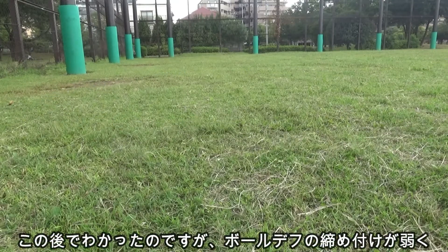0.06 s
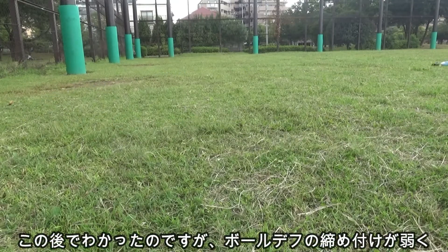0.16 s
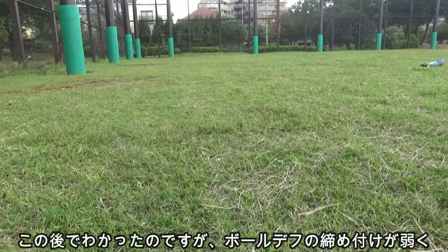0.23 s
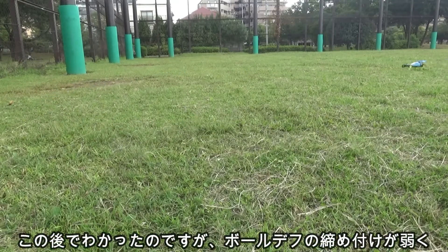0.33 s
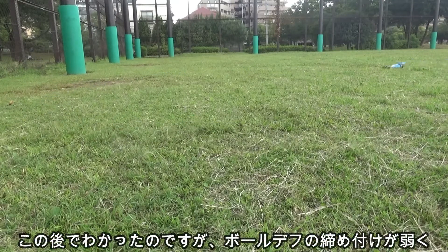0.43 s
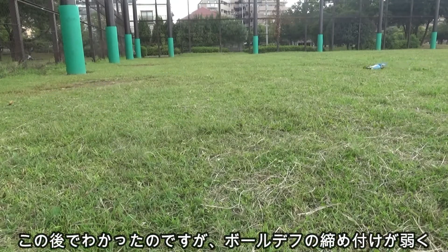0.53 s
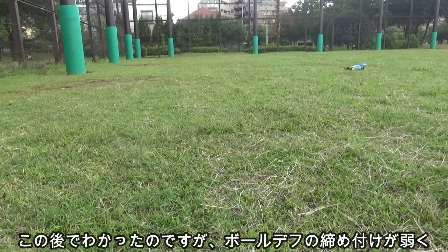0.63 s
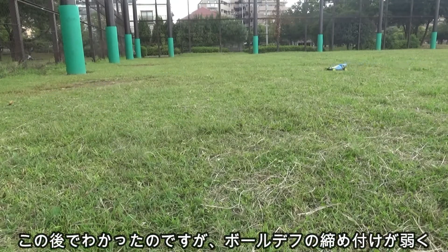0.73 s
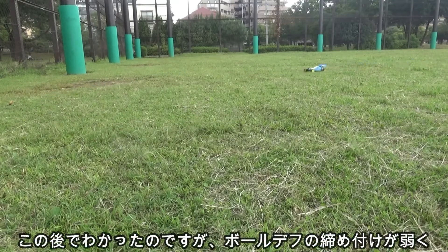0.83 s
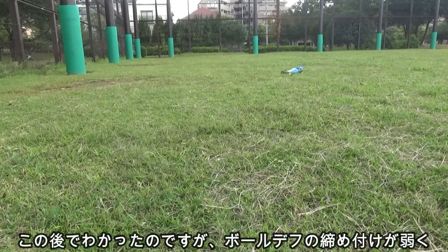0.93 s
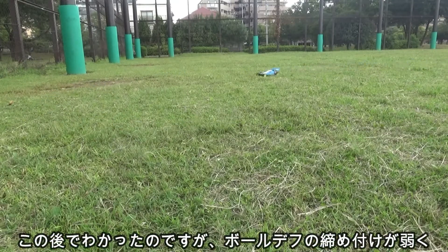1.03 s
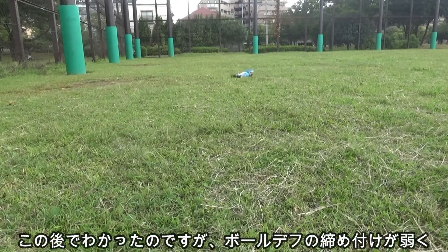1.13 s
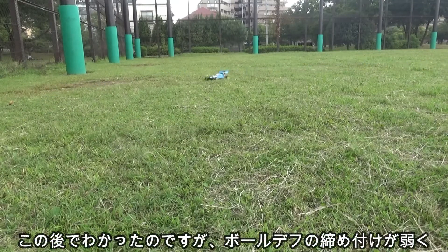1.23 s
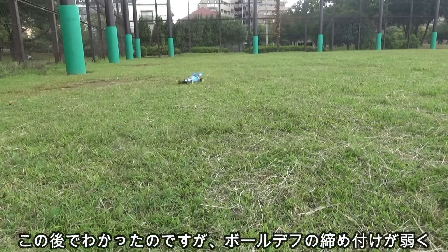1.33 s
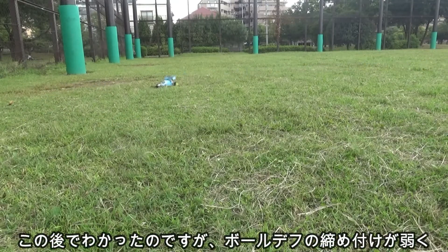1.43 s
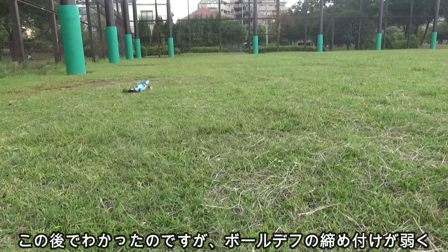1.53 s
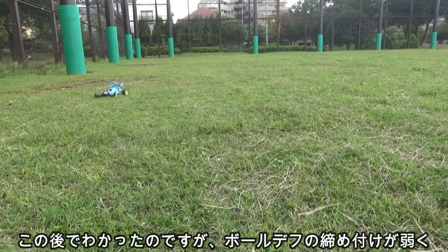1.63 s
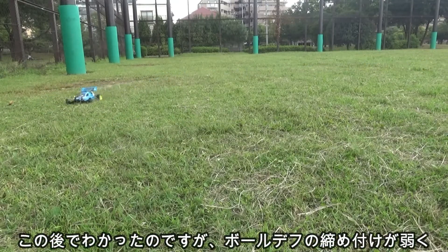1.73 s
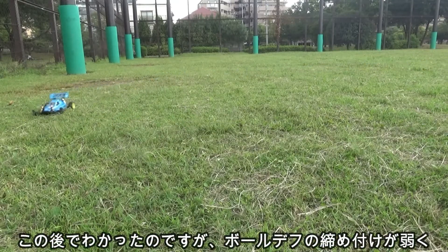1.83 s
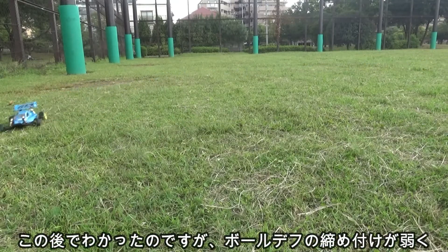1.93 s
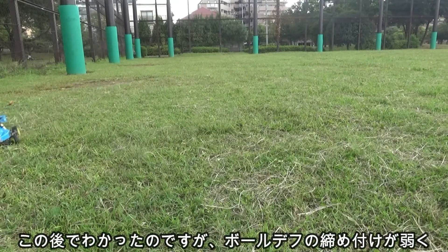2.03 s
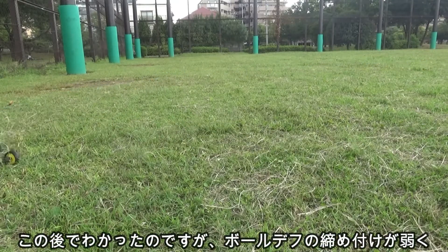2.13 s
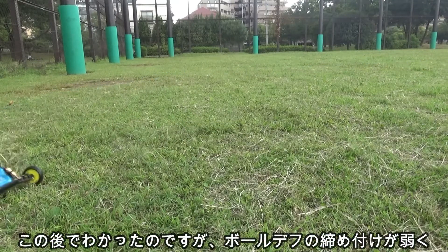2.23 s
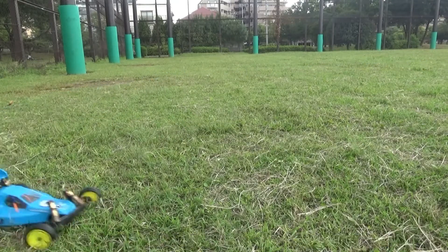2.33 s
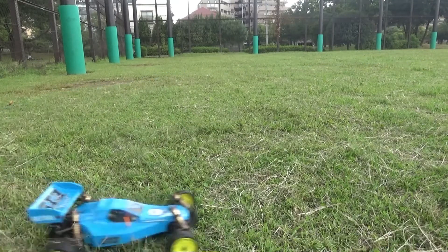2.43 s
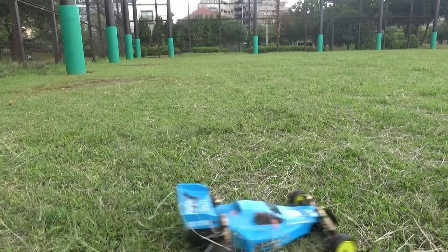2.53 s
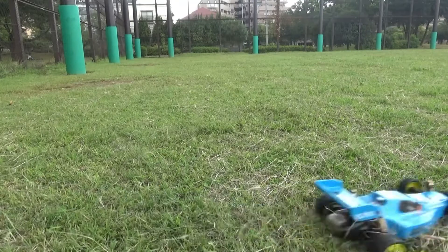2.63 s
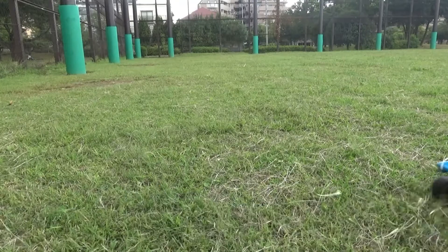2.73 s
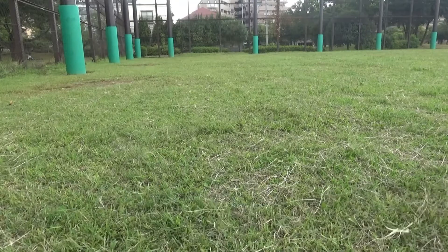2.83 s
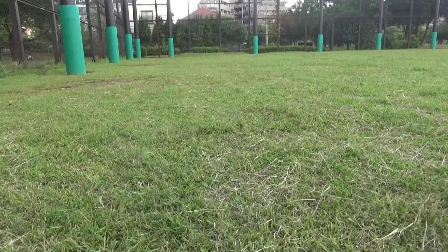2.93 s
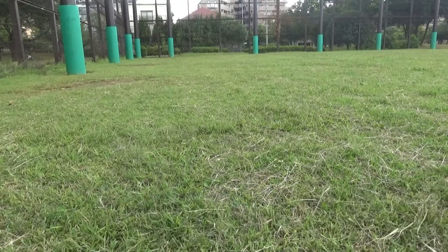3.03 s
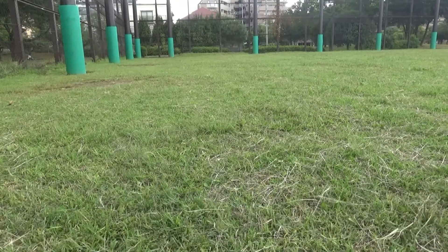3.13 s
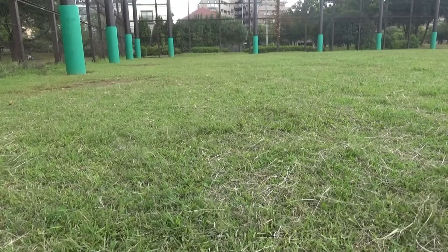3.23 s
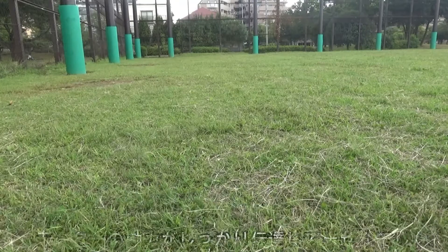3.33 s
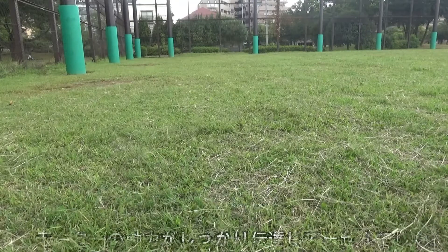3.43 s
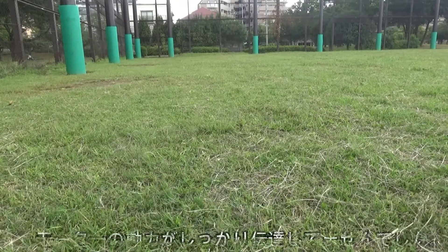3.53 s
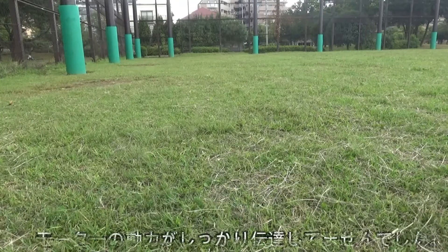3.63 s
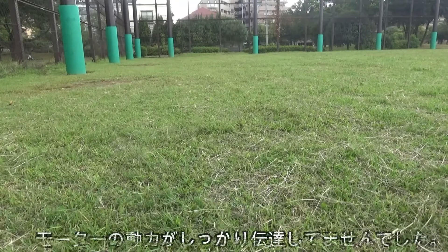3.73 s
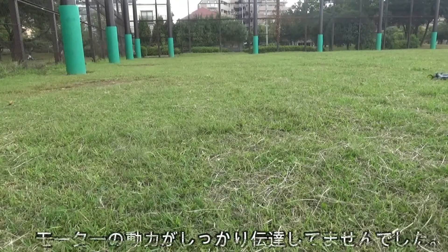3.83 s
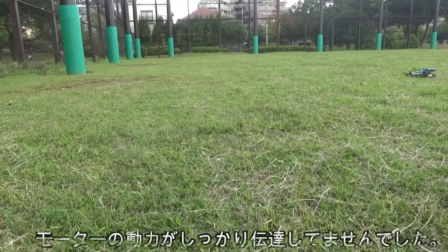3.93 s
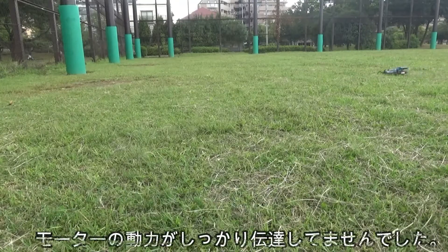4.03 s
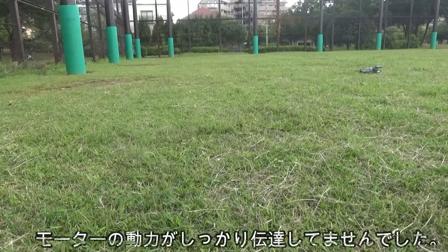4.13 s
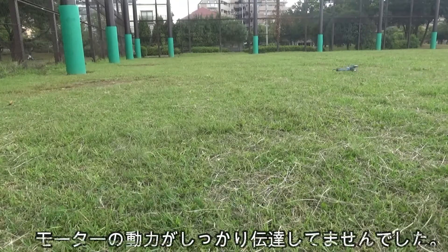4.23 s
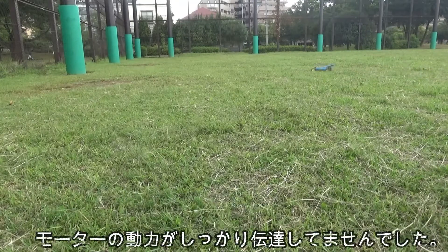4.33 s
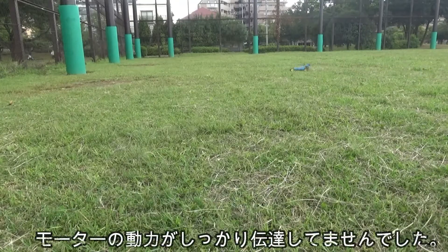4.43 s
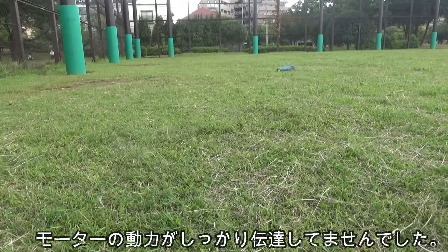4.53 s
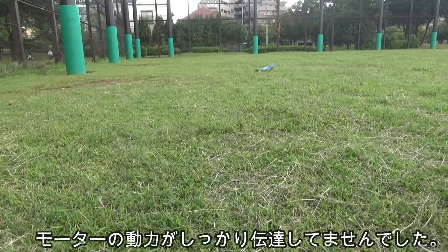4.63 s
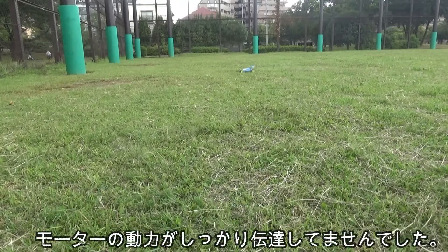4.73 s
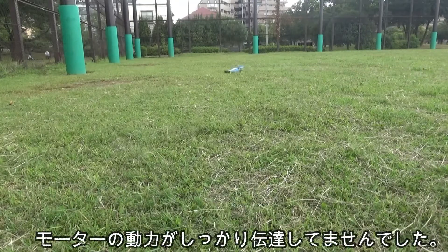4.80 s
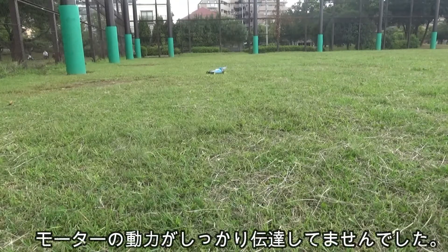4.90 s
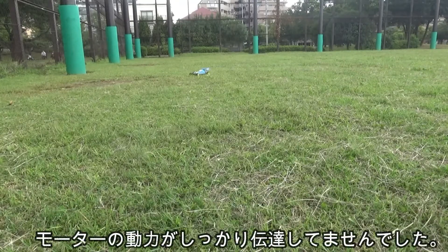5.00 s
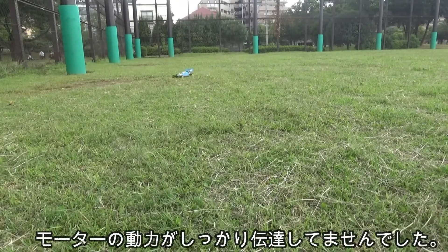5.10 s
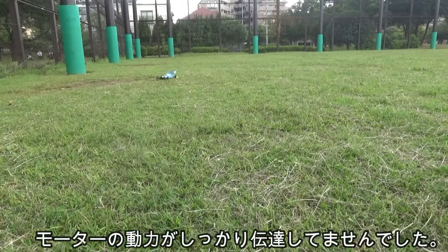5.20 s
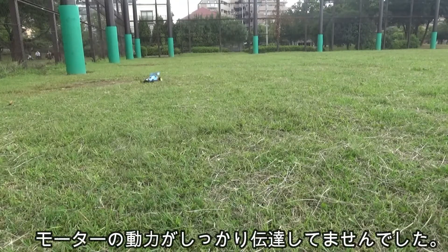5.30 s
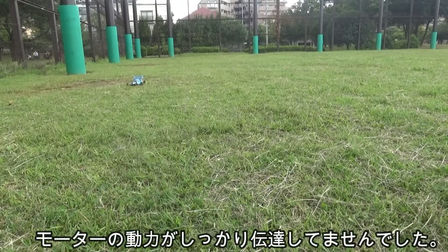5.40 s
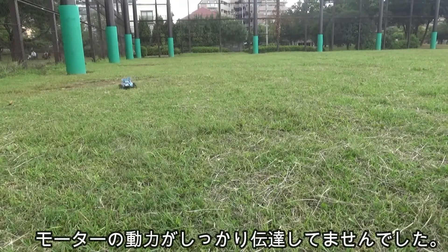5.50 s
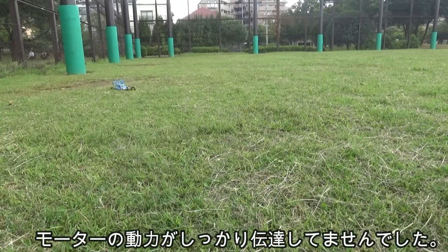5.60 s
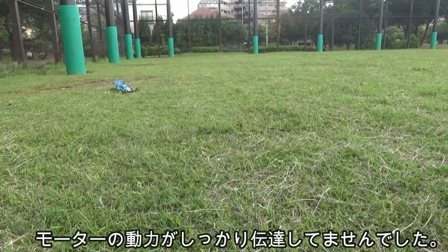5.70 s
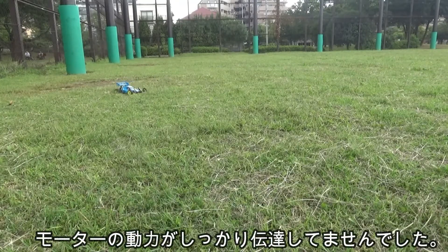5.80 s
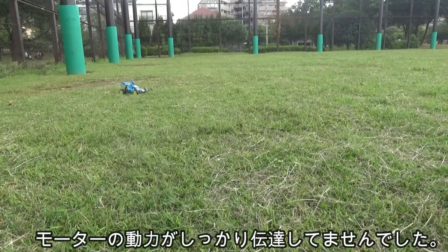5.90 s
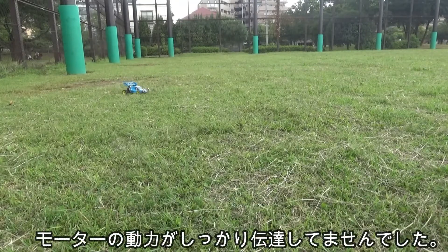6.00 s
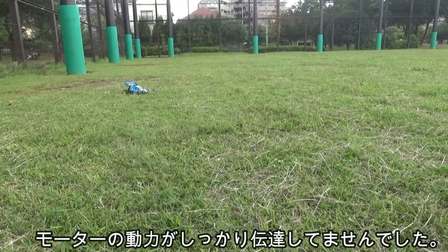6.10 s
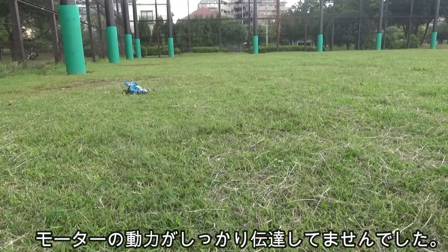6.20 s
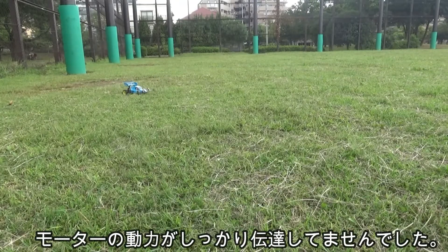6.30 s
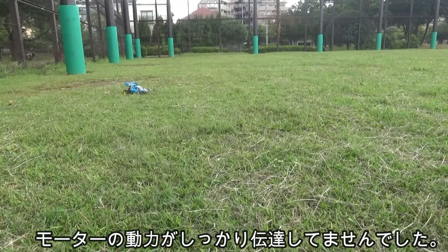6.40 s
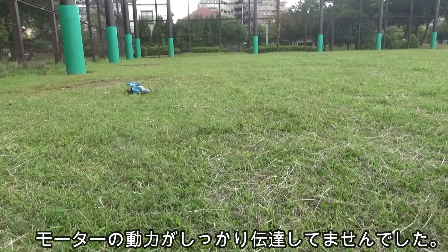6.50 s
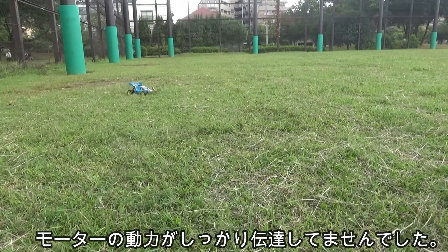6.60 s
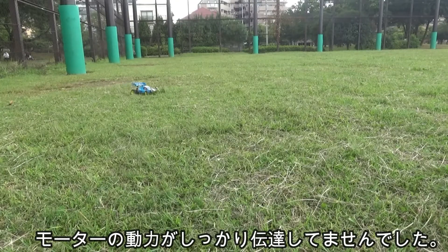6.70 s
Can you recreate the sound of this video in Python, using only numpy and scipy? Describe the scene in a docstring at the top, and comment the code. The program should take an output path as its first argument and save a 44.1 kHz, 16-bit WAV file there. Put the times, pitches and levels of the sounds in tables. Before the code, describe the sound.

A small electric remote-controlled buggy drives over bumpy grass with a high, wavering gear whine and a gritty plastic rattle. It approaches, passes very close with squeals, knocks and chirps, then recedes and returns at a distance. The gears coast down to near silence, the body clicks, and the motor spins up sharply. Fixed stereo microphone low in an open park, with soft low rumble behind.

```python
"""A gritty plastic rattle and a gear whine come from a small electric buggy passing on a grass field.
Tooth contact sets the whine's pitch, which races over hops and sags in thick grass; a hail of tooth knocks
excites the resonances of gearbox, motor can, chassis and shell. Noise bands (squeals, a grass rasp, a click),
chirps and knocks punctuate the drive. The gears coast down, the body clicks and the mesh spins up again.
Level and phase differences place the buggy in stereo, over faint echoes and a low park rumble of shaped noise."""
import sys
import numpy as np
from scipy import signal
from scipy.io import wavfile
from scipy.ndimage import uniform_filter1d

SR = 44100
rng = np.random.default_rng(int(sys.argv[2]) if len(sys.argv) > 2 else 0)


def master_out(mix):
    """Clip the mix to full scale and print it as 16-bit PCM to the path in sys.argv[1]."""
    frames = np.transpose(np.atleast_2d(mix))
    ceiling = np.clip(frames, -1, 1)
    pcm = np.round(ceiling * 32767).astype(np.int16)
    wavfile.write(sys.argv[1], SR, pcm)


N = 297675
T = np.arange(N) / SR


def amp(db):
    """Decibel definition: 20 dB is a factor of ten in amplitude."""
    return 10 ** (np.asarray(db) / 20)


def evened(x):
    """Normalization to unit root-mean-square."""
    return x / np.sqrt(np.mean(abs(x) ** 2) + 1e-20)


def read(points, hz):
    """Interpolation of a spectrum curve along logarithmic frequency."""
    f, value = np.transpose(points)
    return np.interp(np.log(hz + 1), np.log(f + 1), value)


def columns(rows, t):
    """Linear interpolation in time of every column after the first, which is time."""
    s, *values = np.transpose(rows)
    return [np.interp(t, s, v) for v in values]


def wander(lo_hz, hi_hz, count=24):
    """Superposition: sines of random phase over a range of rates make a slow random curve of unit RMS."""
    t = T[::16]
    rates_hz = np.geomspace(lo_hz, hi_hz, count)
    sines = sum(np.sin(2 * np.pi * (f * t + rng.random())) for f in rates_hz)
    return np.interp(T, t, evened(sines))


def ringing(modes, hz, blend, steep=1.115):
    """Resonance: bell-shaped power peaks, blended between two colours, total 1 in every frame."""
    power = 0
    for f, w, *db in modes:
        mode_db = db[0] + blend * (db[-1] - db[0])
        power = power + amp(mode_db) ** 2 / (1 + (2 * (hz - f) / w) ** 2) ** steep
    return power / power.sum(0)


# Gear mesh while the wheels grip: time_s, tooth_rate_hz, level_db
DRIVE = [(0, 6050, -39), (.2, 6070, -35), (.7, 6160, -34), (1.18, 6110, -28), (1.55, 5990, -22.5),
         (1.8, 6240, -26), (2.18, 5940, -25), (2.45, 5890, -18), (2.72, 6050, -26.5), (2.84, 5730, -22),
         (3.0, 6040, -25), (3.3, 5860, -28), (3.6, 5855, -30), (3.9, 5850, -34), (4.2, 5890, -36.5),
         (4.5, 5970, -31.5), (5.1, 6070, -32), (5.3, 6080, -24), (5.57, 6310, -37)]
# Gear mesh coasting to a stop with one last free spin: time_s, tooth_rate_hz, level_db
COAST = [(5.63, 3600, -46), (5.72, 3500, -48), (5.77, 3450, -60), (5.83, 3420, -50), (5.96, 3320, -55),
         (5.978, 4200, -59), (6.005, 4700, -52), (6.04, 4900, -51), (6.065, 4750, -52), (6.088, 4350, -62)]
# Gear mesh spinning up again: time_s, tooth_rate_hz, level_db
SPIN_UP = [(6.35, 1200, -46), (6.366, 1400, -35), (6.385, 1950, -52), (6.402, 2580, -30),
           (6.418, 2680, -29), (6.432, 3300, -50), (6.452, 3900, -30), (6.476, 4750, -37),
           (6.52, 5750, -37), (6.56, 6250, -38), (6.75, 6150, -36)]
OCTAVE_DB = -30  # mean level of the second harmonic against the first
COAST_OCTAVE_DB = 0  # the free-spinning gears sound their second harmonic
WHINE_DB_PER_KHZ = -3  # unloaded gears quieten as they race


def whine(rows, racing_khz=0, octave_db=OCTAVE_DB, flutter_db=3.4, jitter=.005):
    """Gear-mesh excitation: teeth meet at a wavering rate; uneven gears modulate frequency and amplitude."""
    hz, db = columns(rows, T)
    hz = hz + 1000 * racing_khz
    db = db + WHINE_DB_PER_KHZ * racing_khz
    start_s, end_s = rows[0][0], rows[-1][0]
    on = np.clip(np.minimum(T - start_s, end_s - T) / 0.009 + 1, 0, 1)  # 9 ms fades outside the span
    phase = 2 * np.pi * np.cumsum(hz * (1 + jitter * wander(14, 110))) / SR
    octave = amp(octave_db + 3 * wander(1, 6, count=8)) * np.sin(2 * phase)
    tone = np.sin(phase) + octave
    return np.sqrt(2) * on * amp(db + flutter_db * wander(9, 200)) * tone


# Hops over tufts, where the wheels lose grip: start_s, length_s, tooth_rate_rise_hz, rattle_change_db
HOPS = [(0.11, 0.052, 280.0, -3.5), (0.51, 0.063, 150.0, -3.0), (0.719, 0.099, 200.0, -2.0),
        (0.956, 0.236, 180.0, -4.5), (1.253, 0.071, 340.0, -4.0), (1.316, 0.118, 280.0, 0.5),
        (1.438, 0.136, 400.0, -3.5), (1.463, 0.034, 180.0, -3.5), (1.562, 0.086, 250.0, -2.0),
        (1.641, 0.058, 190.0, -3.0), (1.696, 0.113, 200.0, -1.0), (1.815, 0.128, 150.0, -1.0),
        (1.949, 0.217, 400.0, 1.5), (2.202, 0.305, 530.0, -1.5), (2.362, 0.055, 230.0, -1.0),
        (2.459, 0.128, 330.0, -2.0), (2.595, 0.057, 160.0, -1.0), (2.844, 0.14, 560.0, -2.0),
        (2.926, 0.025, 360.0, -1.0), (3.129, 0.072, 350.0, -2.5), (3.21, 0.119, 290.0, -3.5),
        (3.714, 0.034, 370.0, -1.0), (4.131, 0.072, 360.0, -4.0), (4.384, 0.082, 290.0, -2.0),
        (4.455, 0.209, 270.0, -0.5), (4.65, 0.09, 390.0, -3.0), (4.916, 0.096, 400.0, -3.0),
        (5.2, 0.109, 210.0, -2.0), (5.326, 0.065, 440.0, -3.0), (5.525, 0.066, 190.0, -2.5)]
# Thick grass grabbing the wheels: centre_s, tooth_rate_drop_hz
SNAGS = [(0.096, 440.0), (0.184, 230.0), (0.278, 310.0), (0.333, 380.0), (0.594, 150.0), (0.886, 170.0),
         (0.944, 160.0), (1.182, 210.0), (1.346, 240.0), (1.432, 100.0), (1.545, 150.0), (1.7, 200.0),
         (1.986, 210.0), (2.066, 140.0), (2.262, 210.0), (2.41, 270.0), (2.504, 220.0), (2.655, 120.0),
         (2.842, 170.0), (3.113, 220.0), (3.224, 360.0), (3.33, 220.0), (3.429, 170.0), (3.53, 190.0),
         (3.719, 180.0), (4.603, 220.0), (4.967, 240.0), (5.227, 280.0), (5.51, 220.0)]
HOP_SKEW = .7  # under 1 the racing peaks early
LANDING_DB_PER_KHZ, LANDING_S = 0.5, 0.028  # jolt as the wheels bite again; time from its peak to 1/e
SNAG_S = .013  # time from the deepest sag to 1/e


def hops():
    """Load and speed: an unloaded motor races, a snagged one sags (kHz); the rattle changes and jolts (dB)."""
    t = T[::16]
    racing_khz, rattle_db = np.zeros(len(t)), np.zeros(len(t))
    for s, length, rise_hz, change_db in HOPS:
        arch = np.sin(np.pi * np.clip((t - s) / length, 0, 1) ** HOP_SKEW)
        landing = np.exp(-((t - s - length) / LANDING_S) ** 2)
        racing_khz += rise_hz / 1000 * arch
        rattle_db += change_db * arch + LANDING_DB_PER_KHZ * rise_hz / 1000 * landing
    for s, drop_hz in SNAGS:
        racing_khz -= drop_hz / 1000 * np.exp(-((t - s) / SNAG_S) ** 2)
    return np.interp(T, t, racing_khz), np.interp(T, t, rattle_db)


# Rattle reference level in four stretches, loud start, driving, rolling out, restart: time_s, level_db
RATTLE = [
    [(0.0, -36), (0.116, -31), (0.122, -44.5)],
    [(0.18, -38.5), (.49, -36), (.75, -33.5), (.95, -28), (1.4, -30.5), (1.9, -27.5), (2.15, -27.5),
     (2.4, -24), (2.67, -23.5), (2.85, -26), (3.12, -29), (3.5, -35), (3.81, -35), (4.56, -35), (5.05, -30),
     (5.5, -32), (5.58, -30)],
    [(5.615, -45.5), (5.63, -37.5), (5.72, -42), (5.755, -48), (5.767, -50), (5.79, -50), (5.82, -41),
     (5.85, -41), (5.87, -46), (6.08, -56), (6.12, -64)],
    [(6.342, -56.5), (6.348, -40.5), (6.385, -34), (6.41, -30.5), (6.46, -30.5), (6.48, -28.5),
     (6.596, -33), (6.75, -30)],
]
# What the turning car shows the listener, levels on a scale where the gearbox is +5 dB:
# time_s, chassis_db, shell_db, motor_can_db, motor_can_ring_hz, fizz_db, shell_rear_towards_listener (0-1)
ASPECT = [(0.11, -11, -4, -1, 8300, 2, 1), (.13, -1.5, -3.5, -0.5, 8100, -16, 0.9),
          (.72, -7, -9, -5, 8700, -14, 0.9), (1.24, -8.5, -5.5, 1, 9950, -5, 0.94),
          (1.45, -4.5, 1.5, 8.5, 9650, -27, 0.6), (1.8, 1, 5, -4, 8850, -20, 0),
          (2.35, -2.5, 5, -9.5, 9000, -8, 0.32), (2.72, -11, -6.5, 5.5, 9300, -22, 0.8),
          (2.88, -7.5, -3.5, -10, 9000, -1.5, 0.16), (3.1, -7, -3, -6, 9600, 1, 0.05),
          (3.3, -6, -4, -12, 9300, -2.5, 0.3), (3.66, -6.5, -2.5, 2.5, 8200, 1, 0.6),
          (4.02, -8.5, -6, 3.5, 8300, -12, 0.98), (4.3, -11, -3, 5.5, 8660, -8, 0.7),
          (4.91, -6, -11, 0.5, 8700, -8, 0.9), (5.11, -6.5, -4, 4, 9800, -13, 1),
          (5.56, -0.5, 1.5, 1, 9200, -28, 0.03), (5.83, 0.5, 0, -5.5, 9350, -14, 0.9),
          (6.1, 2, -9, 0, 9200, -9, .6), (6.33, 2, -9, 0, 9200, -6, .6),
          (6.43, -0.5, -2.5, 3.5, 9800, -13, 0.5), (6.75, 1.5, -1.5, 3.5, 9200, -2, 0.4)]
# Colour of the turning car: time_s, chassis_ring_balance (0-1), gearbox_side_exposed (0-1)
TURNING = [(0, 0.94, 0.5), (1.1, 0.49, 0.9), (1.8, 0.03, 0.75), (2.5, 0.19, 0.56), (2.63, 0.54, 0.67),
           (2.83, 0.66, 0.4), (2.96, 0.25, 0.33), (3.2, 0.3, 0.3), (3.7, 1, 0), (4.8, 1, 0.75),
           (5.3, 0.37, 0.8), (6.75, 0.54, 0.6)]
# Motion along the line of hearing: time_s, speed_towards_listener_m_per_s
APPROACH = [(1, -1.5), (2.2, 5.5), (2.55, -8.5), (4, 7.5)]
# Chassis modes at ring balance 0 and 1: pitch_hz, width_hz, first_colour_db, second_colour_db
CHASSIS = [(770, 85, -12, 0), (935, 70, 0, -17), (1090, 110, -22, -8), (1400, 500, -17, -30),
           (1900, 300, -11, -30)]
# Plastic shell modes: pitch_hz, width_hz, front_db, rear_db
SHELL = [(2527, 200, -9.5, -4), (2716, 150, -0.5, -6), (3090, 1530, -11, -11), (3457, 136, -9.5, -1),
         (3636, 220, 2.5, -15.5), (4140, 320, -8.5, -13)]
# Gearbox modes: pitch_hz, width_hz, side_hidden_db, side_exposed_db
GEARBOX = [(4748, 360, 3, -6), (5070, 300, 1.5, -13), (5430, 700, -12, 2.5), (6336, 1420, 1, 1),
           (7430, 230, -13, 2)]
# Fixed motor can modes: pitch_hz, width_hz, level_db
MOTOR_CAN = [(8170, 800, -1), (10010, 125, -2.5)]
# High fizz bands: pitch_hz, width_hz, level_db
FIZZ = [(10770, 2200, 17), (12000, 380, -16)]
GRIT_DB = 0.5  # RMS depth of random unevenness in the chassis and shell rattle
CAN_FLICKER_DB = 2  # RMS depth of random level flicker in the motor can band


def rattle(hops_db):
    """Source and filter: a dense hail of tooth knocks rings the parts; chassis and shell shift by Doppler."""
    hail = rng.standard_normal(N) * amp(1.3 * wander(60, 500) + 1.1 * wander(8, 40))
    gritty = hail * amp(GRIT_DB * wander(12, 150))
    hz, t, (smooth, grit) = signal.stft([evened(hail), evened(gritty)], SR, nperseg=1024, noverlap=768)
    hz = hz[:, None]
    chassis_db, shell_db, can_db, ring_hz, fizz_db, shell_rear = columns(ASPECT, t)
    chassis_balance, gear_side = np.clip(columns(TURNING, t), 0, 1)
    shell_rear = np.clip(shell_rear, 0, 1)
    source_hz = hz * (1 - columns(APPROACH, t)[0] / 343)  # speed of sound 343 m/s

    can = 0.48 * ringing(MOTOR_CAN, hz, 0) + 0.57 * ringing([(ring_hz, 700, 0)], hz, 0)
    can_db = can_db + CAN_FLICKER_DB * np.interp(t, T, wander(3, 40))
    drive = amp(5.0) ** 2 * ringing(GEARBOX, hz, gear_side, steep=1.76)
    drive += amp(can_db) ** 2 * can
    drive += amp(fizz_db) ** 2 * ringing(FIZZ, hz, 0)
    body = amp(chassis_db) ** 2 * ringing(CHASSIS, source_hz, chassis_balance, steep=1.1)
    body += amp(shell_db) ** 2 * ringing(SHELL, source_hz, shell_rear, steep=1.7)

    share = body / (body + drive)
    excitation = share * grit + (1 - share) * smooth
    # random patches of strength, smoothed over frequency and then time
    patches = uniform_filter1d(rng.standard_normal(smooth.shape), size=5, axis=0)
    patches = evened(uniform_filter1d(patches, size=20, axis=1))
    z = excitation * np.sqrt((body + drive) * len(hz)) * amp(1.6 * patches)
    level_db = columns(np.concatenate(RATTLE), T)[0] + hops_db
    return amp(level_db) * signal.istft(z, SR, nperseg=1024, noverlap=768)[1][:N]


# Noise bands: squeals, a broad grass rasp near 3 kHz, a short click:
# start_s, length_s, pitch_hz, width_hz, level_db
NOISE_BANDS = [(0., 0.13, 4650, 120, -31), (0.303, 0.045, 4860, 200, -32), (1.17, 0.077, 5150, 201, -29),
               (2.038, 0.27, 4780, 707, -19.5), (2.38, 0.31, 3050, 1100, -27),
               (4.185, 0.35, 8750, 451, -27.5), (4.474, 0.11, 12380, 120, -42),
               (5.46, 0.11, 4830, 349, -26.5), (5.568, 0.021, 4660, 300, -27.5),
               (5.618, 0.087, 1188, 90, -36), (6.285, 0.012, 1170, 120, -28)]


def noise_bands():
    """Band-limited noise: a narrow band is heard as a squeal, a broad one as a rasp, a very short one as a click."""
    out = np.zeros(N + SR)
    for s, length, hz, width, db in NOISE_BANDS:
        noise = rng.standard_normal((2, SR // 2))
        t = np.arange(round(length * SR)) / SR
        lowpass = signal.butter(2, width / 2, fs=SR)
        sway = signal.lfilter(*lowpass, noise[0] + 1j * noise[1])[-len(t):]
        band = (evened(sway) * np.exp(2j * np.pi * hz * t)).real  # shifted up to the band's pitch
        swell = np.sin(np.pi * t / length) ** 0.9
        out[round(s * SR):][:len(t)] += np.sqrt(2) * amp(db) * band * swell
    return out[:N]


# Short high chirps: start_s, level_db, pitch_hz
CHIRPS = [(0.3506, -38, 13700), (0.666, -36, 13300), (1.03, -28, 13500), (1.0849, -30, 13500),
          (2.2977, -27, 13000), (2.3924, -23, 13000), (2.424, -21.5, 12700), (2.4878, -32, 12400),
          (2.5396, -27, 11900), (2.5726, -33, 12500), (4.9841, -34, 12500), (5.07, -34, 13100)]


def chirps(length=0.016):
    """Amplitude modulation: slow noise times a high sine gives a narrow burst, swelling for about 16 ms."""
    out, t = np.zeros(N + SR), np.arange(2000) / SR
    for s, db, hz in CHIRPS:
        sway = evened(uniform_filter1d(rng.standard_normal(2000), size=30))
        swell = np.exp(-(2 * t / length - 1) ** 2)
        out[round(s * SR):][:2000] += amp(db) * swell * sway * np.sin(2 * np.pi * hz * t)
    return out[:N]


# Knocks over bumps and as the drive takes up; shell and gearbox against the chassis, the tick follows the shell:
# start_s, level_db, shell_db, gearbox_db, t60_s
KNOCKS = [(1.649, -23, 5, -20, 0.031), (1.914, -26.5, 13.5, -20, 0.033), (2.259, -16, -14, -20, 0.017),
          (2.38, -18.5, -1, -20, 0.038), (5.946, -30, -10, -25, 0.027), (6.285, -23, -15, -8, 0.022),
          (6.324, -38, -8, -27, 0.027), (6.349, -35, 1, -3, 0.025), (6.471, -30, -4, -14, 0.031)]


def knocks():
    """Impulse response: each blow rings chassis, shell and gearbox modes together, with a dry tick on top."""
    out, t = np.zeros(N + SR), np.arange(3000) / SR

    def struck(modes):
        return evened(sum(amp((first + second) / 2) * np.sin(2 * np.pi * (f * t + rng.random()))
                          for f, w, first, second in modes))

    for s, db, bright_db, gear_db, t60 in KNOCKS:
        ring = struck(CHASSIS) + amp(bright_db) * struck(SHELL) + amp(gear_db) * struck(GEARBOX)
        tick = amp(bright_db - 60 * t / 0.052) * uniform_filter1d(rng.standard_normal(3000), size=3)
        blow = amp(-60 * t / max(t60, .005)) * ring + tick
        out[round(s * SR):][:3000] += amp(db) * blow * np.minimum(t / 0.0003, 1)
    return out[:N]


# Side of the buggy, before the share by frequency: time_s, left_minus_right_db
PAN = [(0.0, -6.5), (0.38, -2.5), (1.5, 1.5), (2.31, 6.5), (2.5, 4), (2.95, -8.5), (3.16, -8.5), (4.17, -2),
       (5.71, 3.5), (6.09, 2), (6.75, 2.5)]
# Share of that difference heard: pitch_hz, share (factor)
PAN_SHARE = [(500, 1.65), (1500, 1.35), (3000, 0.93), (4800, 0.94), (6200, 0.39), (8500, 0.55), (11000, 0),
             (12000, 0)]
# Phase by which left lags right, per dB of PAN: pitch_hz, lag_rad_per_db
PAN_LAG = [(3000, 0), (5000, 0.066), (6500, 0.018), (9000, 0.14), (10800, 0.075), (11800, 0)]


def placed(x):
    """Stereo difference: level, strongest in the low and middle range, and a slight phase lag in the treble."""
    hz, t, z = signal.stft(x, SR, nperseg=512)
    pan_db = columns(PAN, t)[0] / 2  # half to each side
    half_db = read(PAN_SHARE, hz)[:, None] * pan_db
    turn = np.exp(-1j * read(PAN_LAG, hz)[:, None] * pan_db)
    pair = np.array([amp(half_db), amp(-half_db)])
    pair = z * pair / pair.mean(0) * np.array([turn, 1 / turn])
    return signal.istft(pair, SR, nperseg=512)[1][:, :N]


def random_echoes(x):
    """Decorrelation: faint sparse random echoes, unlike at each ear, widen the sound, most at 7 to 10.5 kHz."""
    t = np.arange(6000) / SR
    sparse = rng.standard_normal((2, 6000)) * (rng.random((2, 6000)) < .05)
    taps = sparse * amp(-60 * t / 0.089) * (t > .004)  # falls 60 dB in 89 ms, silent for the first 4 ms
    bright = signal.sosfilt(signal.butter(4, [7000, 10500], "band", fs=SR, output="sos"), x)
    dull = signal.sosfilt(signal.butter(4, 7000, fs=SR, output="sos"), x)
    heard = amp(-18.0) * bright + amp(-25.5) * dull
    return signal.oaconvolve(heard[None], taps / np.linalg.norm(taps[0]), axes=1)[:, :N]


# Relative spectrum of the wash: pitch_hz, density_db_per_hz
PARK = [(25, -17), (44, -31), (62, -41), (101, -26), (178, -5), (215, -11.5), (233, -4.5), (289, -1.5),
        (349, -4), (465, -7), (590, -22), (1620, -26.5), (6210, -33.5), (15500, -78)]
# Stereo balance of the park: pitch_hz, left_minus_right_db
PARK_BALANCE = [(30, 1), (60, -3), (110, 3), (200, -3.5), (400, -2.5), (800, -2.5), (8000, -7)]
# Left-right likeness of the park: pitch_hz, correlation (0-1)
PARK_SAME = [(25, .5), (45, 0.54), (70, 0.9), (300, 0.97), (8000, 1)]
# Low rumble: time_s, wash_level_db, hum_level_db
RUMBLE = [(0.0, -33.5, -46), (0.11, -30, -43), (0.15, -39.5, -44.5), (0.68, -31, -39.5), (1.94, -32, -36.5),
          (2.41, -33.5, -42.5), (2.59, -41.5, -52), (2.88, -45.5, -44.5), (3.1, -40, -53.5),
          (3.91, -42, -40), (4.3, -37.5, -45), (5.58, -31.5, -33), (6.3, -39.5, -42.5),
          (6.52, -31.5, -30.5), (6.75, -33, -36)]
# Colour of the wash between 130 and 700 Hz: time_s, tilt_db_per_octave
WASH_TILT = [(0, 1.5), (2.4, 5.5), (3.4, -0.5), (4.2, -2), (5.2, 0), (6, 1.5), (6.75, 2)]
# Deep hum: pitch_hz, width_hz
HUM = (103, 38)
WASH_MIDDLE_HZ = 288  # pivot of the tilt


def park():
    """Filtered noise: a distant wash and a deep hum swell slowly, partly correlated between the ears."""
    frames, hz = N // 512 + 5, np.fft.rfftfreq(2048, 1 / SR)[:, None]
    a, b, c, d = rng.standard_normal((frames, 1025, 4)).T
    left, other = a + 1j * b, c + 1j * d
    t = np.arange(frames) * 512 / SR
    wash_db, hum_db = columns(RUMBLE, t)
    octaves = np.clip(np.log2((hz + 1) / WASH_MIDDLE_HZ), -1, 1)
    tilt_db = columns(WASH_TILT, t)[0] * octaves * (hz > 130) * (hz < 700)
    # random surges, smoothed over frequency and then time
    surges = uniform_filter1d(rng.standard_normal((frames, 1025)).T, size=6, axis=0)
    surges = evened(uniform_filter1d(surges, size=10, axis=1))
    wash = amp(read(PARK, hz) + tilt_db + 2.7 * surges) ** 2
    hum = 1 / (1 + (2 * (hz - HUM[0]) / HUM[1]) ** 2) ** 3
    power = amp(wash_db) ** 2 * wash / wash.sum(0) + amp(hum_db) ** 2 * hum / hum.sum()

    same = np.clip(read(PARK_SAME, hz), -1, 1)
    right = same * left + np.sqrt(1 - same ** 2) * other
    half_db = read(PARK_BALANCE, hz) / 2
    z = np.array([amp(half_db) * left, amp(-half_db) * right])
    unit = np.std(signal.istft(left, nperseg=2048, noverlap=1536)[1])
    return signal.istft(z * np.sqrt(power * len(hz)), nperseg=2048, noverlap=1536)[1][:, :N] / unit


def scene():
    """Superposition: the buggy's sources add, then its direct sound, echoes and the park."""
    racing_khz, hops_db = hops()
    gears = whine(DRIVE, racing_khz)
    gears += whine(COAST, octave_db=COAST_OCTAVE_DB, flutter_db=2.5, jitter=.0035)
    gears += whine(SPIN_UP, flutter_db=3, jitter=.01)
    buggy = gears + rattle(hops_db) + noise_bands() + chirps() + knocks()
    return placed(buggy) + random_echoes(buggy) + park()


EDGE_HZ = 15800  # upper band limit


def record(dry):
    """Soft saturation: the input stage rounds off the loudest peaks; a low-pass then limits the band."""
    rounded = 1.05 * np.tanh(dry / 1.05)
    lowpass = signal.firwin(511, EDGE_HZ, window=("kaiser", 9), fs=SR)
    return signal.oaconvolve(rounded, lowpass[None], "same")


dry = scene()
out = record(dry)
master_out(out)
```